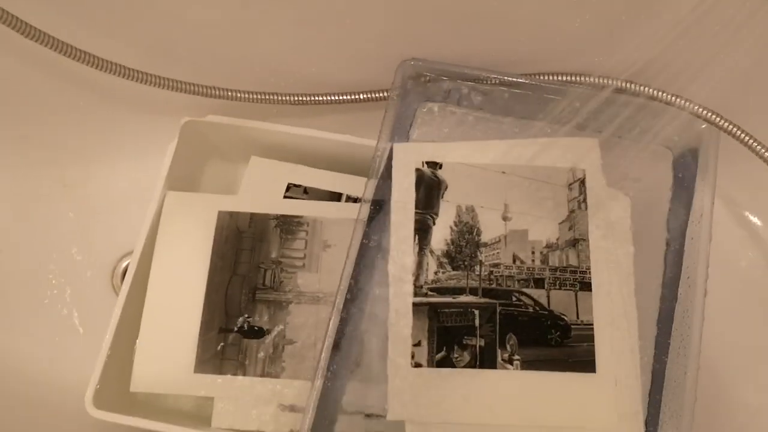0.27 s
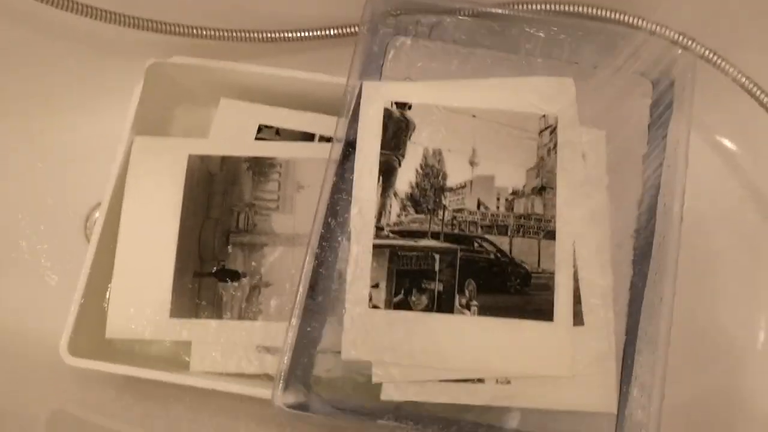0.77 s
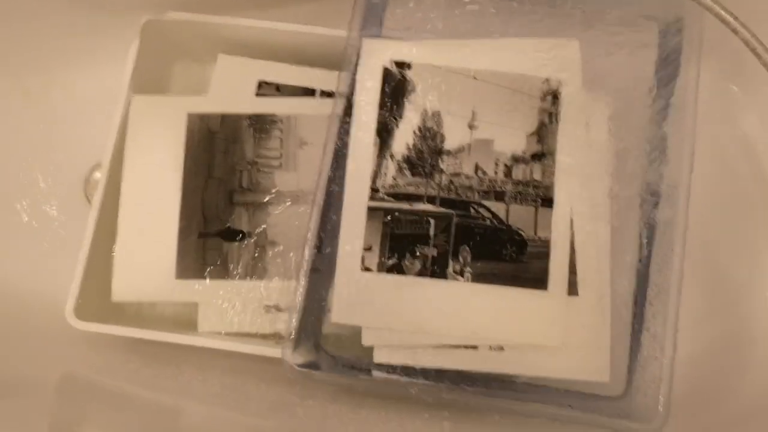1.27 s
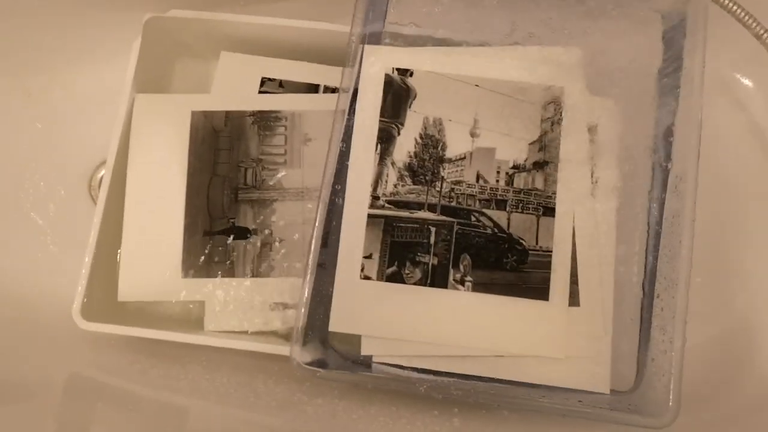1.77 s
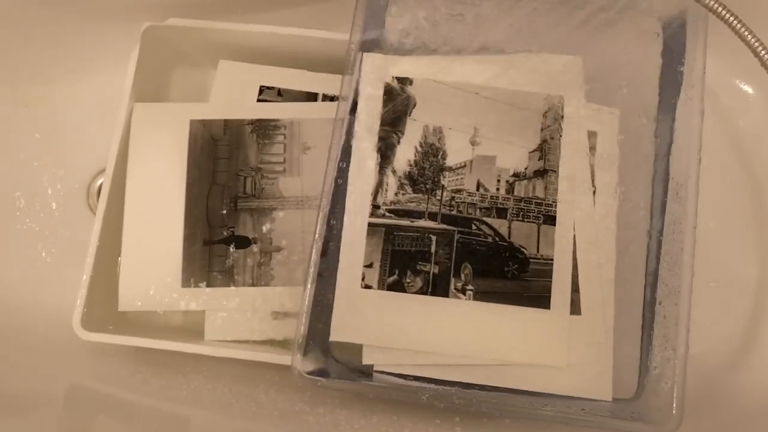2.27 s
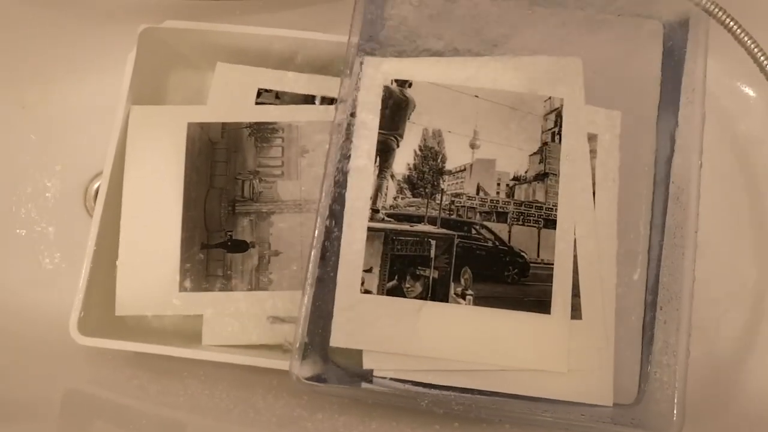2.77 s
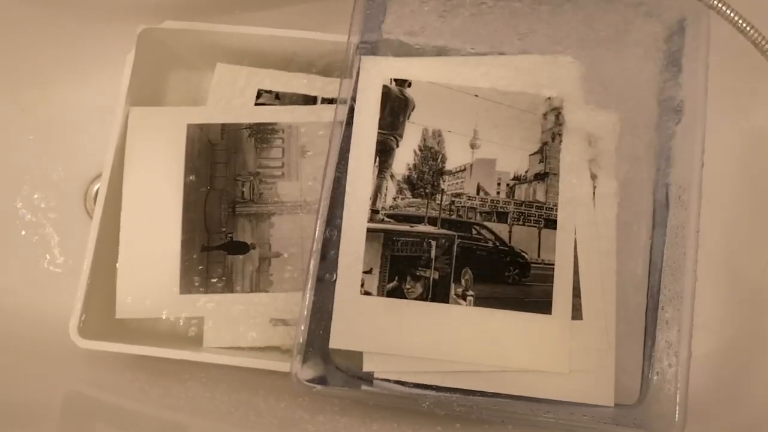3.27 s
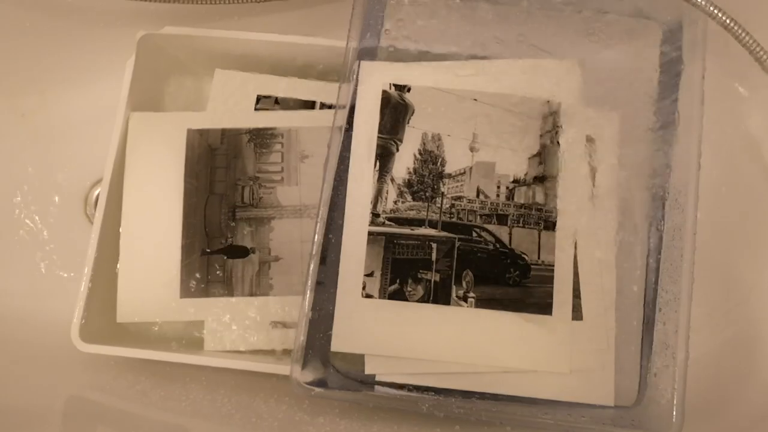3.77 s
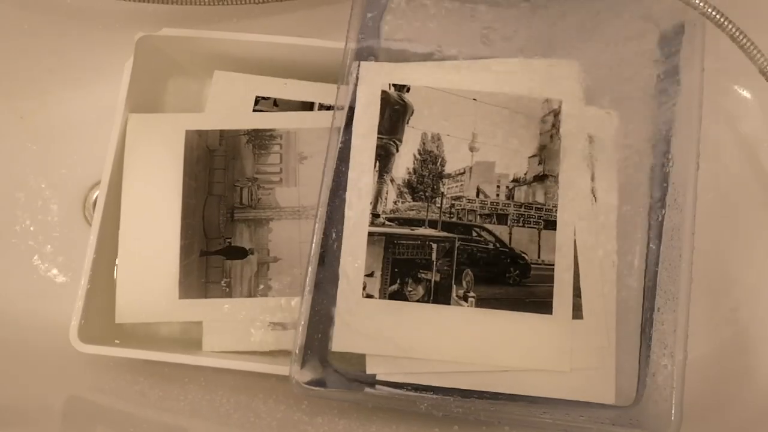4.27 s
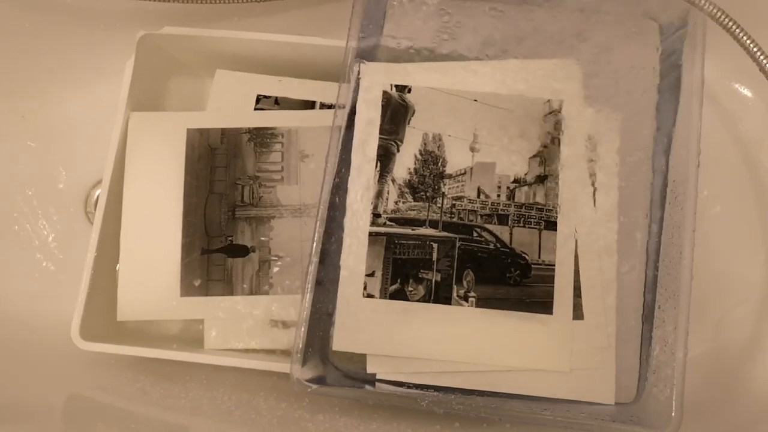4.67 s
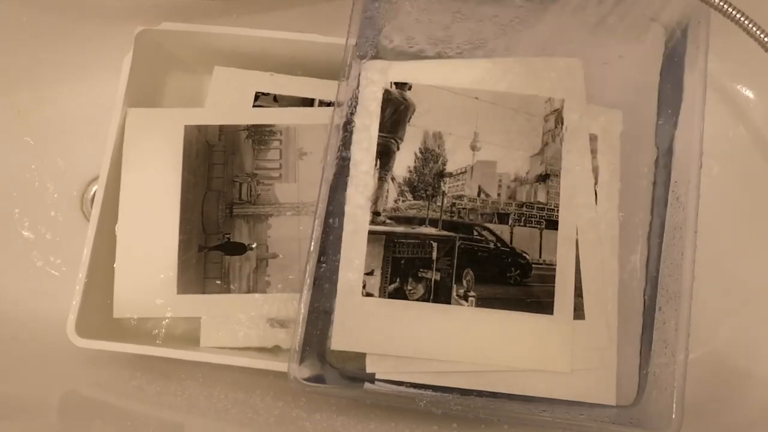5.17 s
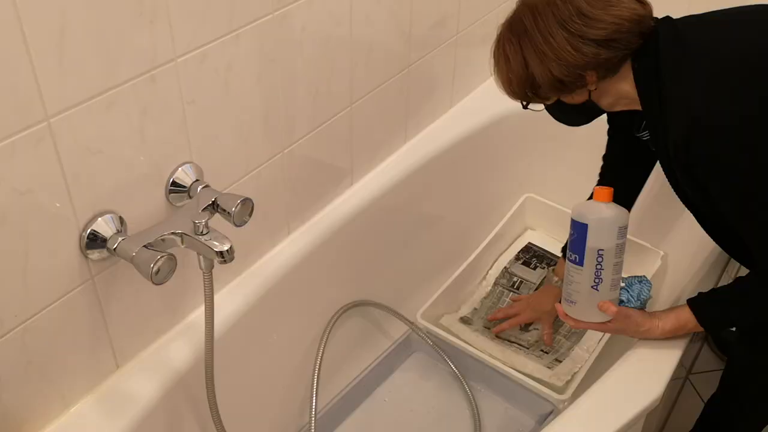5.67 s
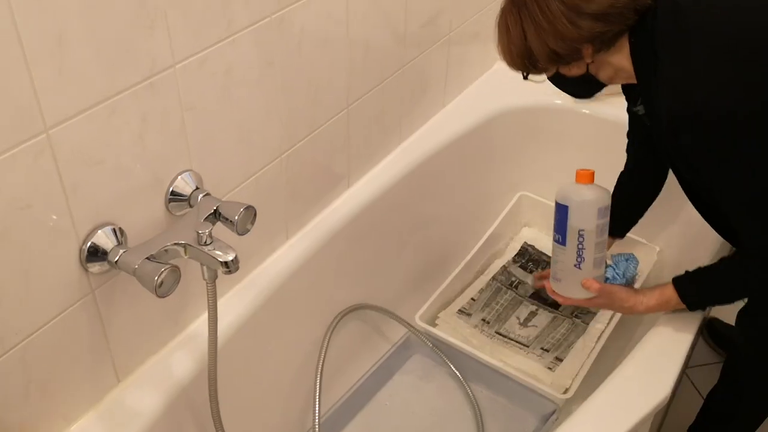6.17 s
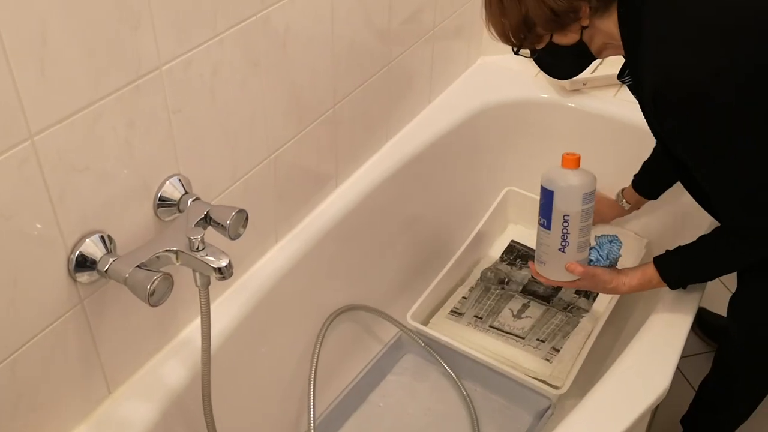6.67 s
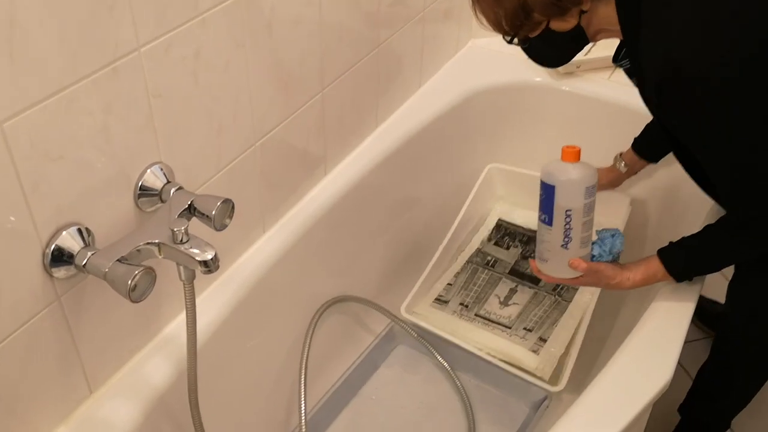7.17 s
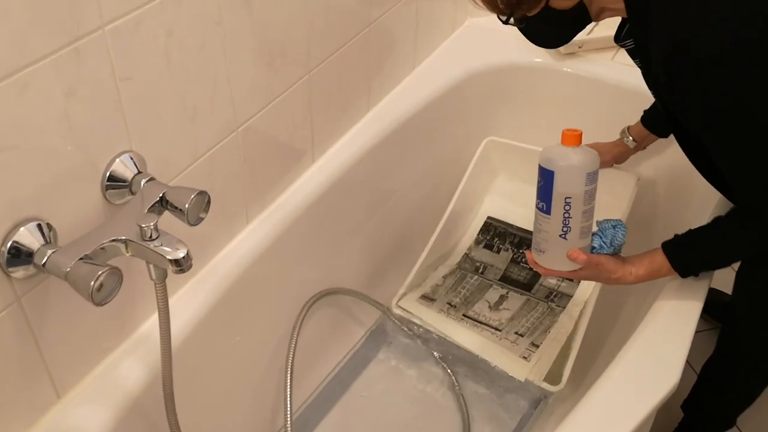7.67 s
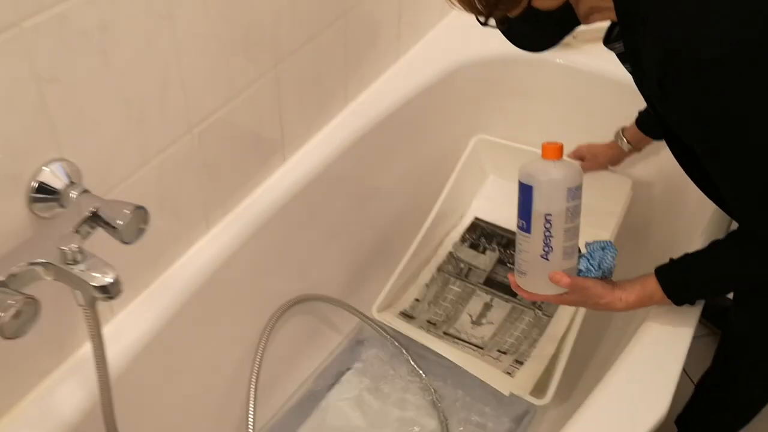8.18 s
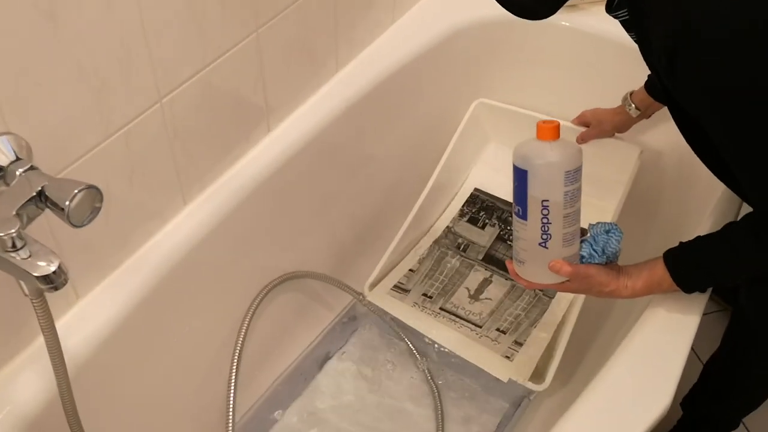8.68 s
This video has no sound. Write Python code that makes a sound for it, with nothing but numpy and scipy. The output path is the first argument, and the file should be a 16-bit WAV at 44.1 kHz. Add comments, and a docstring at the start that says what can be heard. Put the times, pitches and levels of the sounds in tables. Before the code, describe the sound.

A hand shower sprays and gurgles into a water-filled plastic tray up close, then silence, tray knocks on a hollow bathtub and water pouring out.

```python
"""A hand shower runs into a plastic tray of water in a bathtub, close by: spray hisses and fizzes, jets gurgle.
After a short silent break the tiled bathroom is heard from farther off: a tray is shifted on the hollow tub,
clacks against it, and is tipped so that its water pours out and dribbles away.
Bubbles are decaying sines born at random, streams of water are coloured noise, struck bodies are sums of
damped modes, and the room is a reverberation of decaying noise."""
import sys
import numpy as np
from scipy import signal
from scipy.fft import rfft, irfft, next_fast_len
from scipy.io import wavfile
from scipy.ndimage import uniform_filter1d

SR = 44100
rng = np.random.default_rng(int(sys.argv[2]) if len(sys.argv) > 2 else 0)


def wav_out(sig):
    """Save sig, one row per channel (or a flat mono array), as 16-bit PCM at SR to the path in sys.argv[1]."""
    wavfile.write(sys.argv[1], SR, np.round(np.clip(np.atleast_2d(sig).T, -1, 1) * 32767).astype(np.int16))


N = 394254
TIME = np.arange(N) / SR

# Levels stand before the trims stated in each mix; spectra and modes give relative levels.
# Silent break between the near and the far part: (start [s], end [s])
BREAK = (5.676, 6.047)

# Spray on the water, swelling as the shower head swings over it: (time [s], hiss [dB], fizz [dB])
SPRAY_LEVELS = [(0, -44.5, -40), (0.22, -64.5, -42.5), (0.63, -56.5, -50), (0.76, -49, -43.5),
                (0.9, -43.5, -41), (1.47, -40, -36), (1.53, -47.5, -40), (2.1, -48.5, -44.5),
                (2.45, -56.5, -57), (2.75, -54, -58), (3, -53.5, -47), (3.55, -45.5, -42.5),
                (3.75, -52, -47), (4.7, -53, -55.5), (4.92, -52.5, -47), (5.25, -58.5, -58.5)]
# Heavy drops that splash, ringing near the pitch of the fizz: (time [s], peak [dB])
HEAVY_DROPS = [(0.1467, -21), (0.381, -23.5), (0.7086, -34), (0.771, -25), (1.1682, -25.5), (1.39, -24),
               (1.6597, -22), (1.8607, -21), (2.1966, -26), (2.929, -29.5), (3.1664, -21)]
# Spectra of the smooth hiss and of the fizz: (frequency [Hz], density [dB per Hz])
HISS_SPECTRUM = [(1100, -15), (1600, 14), (2600, 20), (4000, 1), (5400, 10), (6900, 14.5), (9500, 3.5),
                 (12000, -35.5)]
FIZZ_SPECTRUM = [(5500, -18), (7700, -4), (8500, -25), (10000, 2)]
FIZZ_HZ, FIZZ_SAG_HZ_PER_S = 8515, 376  # nominal pitch of the finest bubbles at the start, and its fall
# Satellite bubbles of a splash: mean delay [s], greatest rise in pitch [octaves], level [dB]
SPLASH_DELAY_S, SPLASH_OCTAVES, SPLASH_DB = .002, .25, -8

# The jets stray on to the tray's bare wall: (time [s], length [s], drumming [dB], sizzle [dB])
WALL_PASSES = [(0, 0.13, -55.5, -36.5), (0.1, 0.59, -71, -40), (3.22, 0.35, -60, -42.5),
               (4.07, 0.25, -63, -50)]
# Spectra of the drumming and of the sizzle: (frequency [Hz], density [dB per Hz])
DRUMMING_SPECTRUM = [(80, 5), (160, -3.5), (230, 4), (390, -3), (600, -13.5), (870, 0.5)]
SIZZLE_SPECTRUM = [(7000, -0.5), (11000, -33.5), (14700, -31)]
PASS_ATTACK_S, PASS_RELEASE_S = 0.015, 0.015
DRUM_UNDER_HISS_DB, SIZZLE_REST_DB = -18.5, -52.5  # what reaches the tray through the water

# Gulps of air dragged under by the jets:
# (time [s], length [s], level [dB], nominal lowest pitch at the start [Hz], its fall [octaves])
GULPS = [(0.351, .08, -43.5, 2120, 0.0089), (0.5, .1, -44, 2055, -0.12), (0.717, .12, -44, 1540, 0.016),
         (0.845, .13, -38.5, 1438, 0.26), (0.971, .21, -34.5, 1083, -0.12), (1.198, .28, -33, 1254, 0.13),
         (1.483, .15, -37.5, 1360, 0.18), (1.633, .27, -39.5, 1283, -0.13), (1.922, .28, -39, 1203, -0.23),
         (2.636, .12, -48.5, 1523, -0.26), (2.82, .26, -36, 1371, 0.22), (3.105, .17, -32, 1476, 0.34),
         (3.328, .23, -33, 1021, -0.26), (3.58, .23, -39.5, 1484, 0.31), (3.88, .09, -43, 1703, 0.3),
         (3.966, .17, -37.5, 1398, 0.45), (4.222, .07, -42, 954, 0.099), (4.302, .15, -35.5, 1089, 0.18),
         (4.64, .25, -48, 1586, 0.45), (4.946, .11, -42.5, 1360, 0.071), (5.545, .13, -35, 1522, 0.075)]
# Single large bubbles: (time [s], peak [dB], pitch [Hz])
LARGE_BUBBLES = [(2.798, -22.5, 2592), (2.813, -26, 1596), (2.8804, -27, 1436), (3.1093, -25, 2532),
                 (3.8257, -28, 1830), (3.905, -27, 2108), (3.9963, -32.5, 3123), (4.0382, -30, 1473),
                 (4.2963, -23, 2283), (4.3493, -24.5, 1379), (5.5416, -31, 1720), (5.5702, -25.5, 2304)]
# Spectrum of the fused bubbles before bending: (frequency [Hz], density [dB per Hz])
WASH_SPECTRUM = [(1200, -15.5), (1650, 4.5), (2300, 4.5), (3600, -19.5)]
GULP_ATTACK_S, GULP_RELEASE_S = .025, .04
CALM_DB, CALM_HZ = -64, 1207  # the bubbling between gulps
FAINT_DB, STRONG_DB = -48, -32.5  # levels of a faint and of a strong gulp
NARROW_OCTAVES, WIDE_OCTAVES = .42, 1.54  # nominal spread of bubble pitches in each
FAINT_TOP_HZ, STRONG_TOP_HZ = 2099, 4400  # nominal pitch of the smallest bubbles that each can make
WASH_HZ, WASH_FOLLOWS = 1993, .7  # centre of the wash; share of the gulps' pitch swing that it follows

# Hard knocks of the tray: (time [s], level [dB], rattle decay to 1/e [s], treble tilt [dB per octave])
KNOCKS = [(0.002, -40.5, 0.047, -4), (6.785, -52.5, 0.03, 0.5), (6.849, -22.5, 0.0091, -4),
          (6.872, -26.5, 0.046, -5), (7.034, -30.5, 0.0099, -1.5), (7.876, -34, 0.0087, 4.5),
          (8.803, -48, 0.0053, -0.5)]
# Spectrum of the crack before its tilt: (frequency [Hz], density [dB per Hz])
CRACK_SPECTRUM = [(170, -27), (400, -15.5), (600, -16), (950, -15), (2700, -6.5), (3900, -17), (5000, -9),
                  (8900, -23), (14800, -68)]
# Modes with which the tray rings: (frequency [Hz], level [dB], t60 [s])
TRAY_MODES = [(389, -0.5, 0.39), (462, -3, 0.36), (777, -12, 0.17), (849, 7, 0.11), (973, 0.5, 0.15)]

# Hollow glugs of trapped air: (time [s], length [s], level [dB])
HOLLOW_GLUGS = [(0.99, .16, -54), (1.631, .21, -53), (2.0, .14, -58), (2.368, .23, -62.5),
                (3.22, .18, -55.5), (3.516, .09, -48), (6.03, .08, -53), (7.709, .11, -55),
                (8.263, .06, -55)]
HOLLOW_HZ, HOLLOW_STRAY = 893.4, 1.17  # pitch of their bubbles; greatest ratio by which they stray from it

# Soft bumps on the tub: (time [s], level [dB], contact time [s])
BUMPS = [(4.584, -38.5, 0.0044), (4.812, -37.5, 0.007), (6.507, -31, 0.0037), (6.542, -32.5, 0.0027),
         (7.218, -40, 0.0016), (7.586, -32, 0.0054), (7.883, -25, 0.0072)]
# Modes with which the tub booms: (frequency [Hz], level [dB], t60 [s])
TUB_MODES = [(71.5, -5, 0.45), (111.5, 4.5, 0.21), (170.2, -8.5, 0.52), (232.4, 3.5, 0.12)]
# The tray is shoved over the tub: (time [s], length [s], rumble [dB])
SHOVES = [(6.06, 0.047, -49), (6.3, 0.087, -42.5), (6.48, 0.052, -37.5), (6.85, 0.15, -31),
          (7.22, 0.0088, -40), (7.46, 0.1, -51), (7.87, 0.19, -36)]
# Spectrum of the rumble: (frequency [Hz], density [dB per Hz])
RUMBLE_SPECTRUM = [(55, 1), (110, 19.5), (190, 6.5), (350, 10), (550, 0.5), (1000, -1)]
SHOVE_ATTACK_S, SHOVE_RELEASE_S, HANDLING_DB = 0.0021, 0.09, -58  # the last is the rumble between shoves

# Water slops in and out of the tipped tray: (time [s], length [s], slosh [dB], splatter [dB])
SLOPS = [(6.021, 0.11, -50, -64.5), (6.19, 0.1, -57.5, -71.5), (7.614, 0.059, -60.5, -56.5),
         (7.704, 0.091, -50, -52.5), (7.773, 0.19, -42, -47), (7.894, .12, -39, -48.5),
         (8.03, 0.17, -43, -50), (8.22, 0.14, -50, -61), (8.357, 0.14, -54, -67.5),
         (8.646, 0.086, -53.5, -56.5), (8.779, 0.11, -55, -55.5)]
# Single drips off the tray: (time [s], peak [dB], pitch [Hz])
DRIPS = [(7.632, -39, 5600), (8.075, -31.5, 5450), (8.14, -33, 5200), (8.665, -41.5, 2410),
         (8.703, -42, 3370), (8.7565, -39.5, 8800), (8.805, -32.5, 5500), (8.875, -51, 1880)]
# Spectrum of the splatter: (frequency [Hz], density [dB per Hz])
SPLATTER_SPECTRUM = [(2800, -12.5), (3900, -18.5), (5200, -14), (8900, -21.5), (14500, -35)]
SLOP_ATTACK_S, SLOP_RELEASE_S = 0.028, 0.037
LAPPING_DB = -71  # slosh between slops
FAINT_SLOSH_HZ, STRONG_SLOSH_HZ = 2248, 1523  # a stronger slop traps larger bubbles

# Spectrum of the room's background: (frequency [Hz], density [dB per Hz])
ROOM_TONE = [(30, 21), (100, 18.5), (250, -5.5), (1200, -6), (5500, -11.5), (15000, -33)]
# Bathroom reverberation: (frequency [Hz], t60 [s])
ROOM_T60 = [(150, 0.16), (1000, 0.37), (12000, 0.22)]
ROOM_TONE_DB, CUTOFF_HZ = -56.5, 15700


def from_db(db):
    """Amplitude gain is ten to the power of a twentieth of the decibels."""
    return 10 ** (np.asarray(db) / 20)


def in_time(rows):
    """Linear interpolation gives each column of a curve at every sample."""
    s, *columns = np.transpose(rows)
    return [np.interp(TIME, s, column) for column in columns]


def at_hz(points, hz):
    """Interpolation on a logarithmic frequency axis, as octaves are equal ratios."""
    table_hz, values = np.array(points).T
    return np.interp(np.log(hz + 1e-9), np.log(table_hz), values)


def unit(x):
    """Power normalisation: the centre of a stereo pair gets rms 1."""
    return x / np.sqrt(np.mean(x.mean(0) ** 2) + 1e-20)


def steady(x, span_s):
    """Division by the short-time rms evens out the slow swells of a stream of grains."""
    x = unit(x)
    power = uniform_filter1d(x.mean(0) ** 2, max(int(span_s * SR), 2))
    return x / np.sqrt(power + 1e-3)


def panned(x, pan_db):
    """Level difference between the ears: left louder than right by pan_db."""
    return x * from_db([[pan_db / 2], [-pan_db / 2]])


def coloured(x, spectrum, tilt_db=0):
    """Spectral shaping: a table, tilted per octave up to 6 kHz and falling steeply past its ends."""
    size = next_fast_len(x.shape[-1])
    hz = np.arange(size // 2 + 1) * SR / size + 1
    octaves_outside = np.abs(np.log2(hz / np.clip(hz, spectrum[0][0], spectrum[-1][0])))
    tilt = tilt_db * np.log2(np.minimum(hz, 6000))
    gain = from_db(at_hz(spectrum, hz) + tilt - 30 * octaves_outside)
    return unit(irfft(rfft(x, size) * gain, size)[:, :x.shape[-1]])


def noise(side, size=N):
    """White noise whose stereo coherence falls from mono at side 0 to fully diffuse at 1."""
    mid, wide = rng.standard_normal((2, size))
    return unit(np.array([mid + side * wide, mid - side * wide]))


def add(out, s, sound):
    """Superposition: mix a sound in at time s."""
    at = max(int(s * SR), 0)
    out[:, at:at + sound.shape[-1]] += sound[..., :N - at]


def wander(per_s):
    """Random modulation: chance values of spread about 1, joined by straight lines."""
    steps = rng.standard_normal(N // 100)
    return np.interp(TIME * per_s, np.arange(len(steps)), steps)


def swell(s, length_s, attack_s, release_s):
    """Envelope of one gesture: a linear rise, a hold and an exponential decay."""
    rise = np.clip((TIME - s) / attack_s, 0, 1)
    decay = np.exp(-np.clip((TIME - s - length_s) / release_s, 0, np.log(1e12)))
    return rise * decay


def swells_db(rows, attack_s, release_s, rest_db):
    """Powers of gestures (time, length, levels) add over a rest: one curve for each level column."""
    shapes = np.array([swell(s, length_s, attack_s, release_s) for s, length_s, *_ in rows])
    _, _, *columns = np.transpose(rows)
    curves = []
    for db, rest in zip(columns, rest_db):
        power = from_db(db) ** 2 @ shapes ** 2 + from_db(rest) ** 2
        curves.append(10 * np.log10(power + 1e-12))
    return curves


def plinks(rows, cycles, pan_db, lag_s=0, scatter_db=2):
    """Bubble resonance: each (time, dB, Hz) swells and dies within a few cycles at a place of its own."""
    s, db, hz = np.transpose(rows)[:, :, None]
    t = TIME[:int(7 * SR * cycles / np.quantile(hz, .1))]
    age = t * hz / cycles
    wave = from_db(db) * age * np.exp(1 - age) * np.sin(2 * np.pi * hz * t)
    left = 2 / (1 + from_db(-pan_db - scatter_db * rng.standard_normal(s.shape)))
    lag = lag_s * rng.uniform(-.5, 1, s.shape)  # the right ear mostly hears it later
    ears = []
    for start, gain in [(s, left), (s + lag, 2 - left)]:
        samples = np.abs(start * SR).astype(int) + np.arange(len(t))
        ears.append(np.bincount(samples.ravel(), (wave * gain).ravel(), N)[:N])
    return np.array(ears)


def swarm(count, span, low_hz, high_hz, size_db, flow_db=0):
    """Random births, denser in strong flow, give bubbles scattered in size and pitch; deep ones are rare."""
    births = np.cumsum(from_db(.7 * flow_db) * (TIME > span[0]) * (TIME < span[1]))
    s = np.interp(rng.random(count), births / births[-1], TIME)
    low, high = (np.interp(s, TIME, hz + 0 * TIME) for hz in (low_hz, high_hz))
    size = np.minimum(rng.standard_normal(count), 2.3)
    pitch = low * (high / low) ** rng.beta(2.8, 2, count)
    return np.column_stack([s, min(size_db, 10) * size, pitch])


def splashed(rows):
    """Break-up: each drop (time, dB, Hz) rings one bubble and a quick burst of six of scattered pitch."""
    s, db, hz = np.repeat(rows, 6, axis=0).T
    stray = SPLASH_OCTAVES * rng.uniform(-1.864, 1, len(s))
    delay = rng.exponential(SPLASH_DELAY_S, len(s))
    return np.vstack([rows, np.column_stack([s + delay, db + SPLASH_DB, hz * 2 ** stray])])


def ringing(modes):
    """Modal superposition: one second of damped sines, each of random strength per blow; peak 1."""
    t = TIME[:SR]
    out = 0
    for k, (hz, db, t60) in enumerate(modes):
        decay = from_db(db + rng.normal(0, 3.2) - 60 * t / t60)
        out = out + decay * np.sin(2 * np.pi * hz * t) * (-1) ** k
    return out / np.abs(out).max()


def spray():
    """Droplet impact: uneven patter and splashes leave a fizz of tiny bubbles over a smooth hiss."""
    close = (0, BREAK[0])
    hiss_db, fizz_db = in_time(SPRAY_LEVELS)
    fizz_hz = FIZZ_HZ - FIZZ_SAG_HZ_PER_S * TIME
    flurry = from_db(1.8 * wander(per_s=27))
    patter = swarm(11000, close, low_hz=2000, high_hz=8200, size_db=5, flow_db=hiss_db / 2)
    patter = plinks(patter, cycles=3.4, lag_s=0.00051, pan_db=6.0, scatter_db=2.5)
    patter = steady(patter, span_s=0.34)
    hiss = coloured(panned(noise(side=1.0), pan_db=6.0), HISS_SPECTRUM)
    fizz = swarm(5500, close, low_hz=0.809 * fizz_hz, high_hz=1.15 * fizz_hz, size_db=7.5)
    fizz = coloured(plinks(fizz, cycles=12.1, pan_db=28.5), FIZZ_SPECTRUM)
    fizz = steady(fizz, span_s=0.37)
    splashes = swarm(170, close, low_hz=4800, high_hz=1.1 * fizz_hz, size_db=4)
    splashes = unit(plinks(splashed(splashes), cycles=5.5, pan_db=15)) * from_db(-9)
    s, db = np.transpose(HEAVY_DROPS)
    drops = splashed(np.column_stack([s, db - 2, np.interp(s, TIME, 0.974 * fizz_hz)]))
    drops = plinks(drops, cycles=6, pan_db=16)
    impacts = (patter * flurry + hiss) * from_db(hiss_db)
    return impacts + (fizz * flurry + splashes) * from_db(fizz_db) + drops


def jets():
    """Jet impact: low noise drums on the tray, and tiny ticks sizzle where the jets hit its bare wall."""
    hiss_db, _ = in_time(SPRAY_LEVELS)
    rest_db = [hiss_db + DRUM_UNDER_HISS_DB, SIZZLE_REST_DB]
    drum_db, sizzle_db = swells_db(WALL_PASSES, PASS_ATTACK_S, PASS_RELEASE_S, rest_db)
    ticks = swarm(6000, (0, BREAK[0]), low_hz=8000, high_hz=15000, size_db=8)
    sizzle = coloured(plinks(ticks, cycles=1.4, lag_s=0.0029, pan_db=-1), SIZZLE_SPECTRUM)
    drumming = coloured(noise(side=0.14), DRUMMING_SPECTRUM)
    return sizzle * from_db(sizzle_db - 10.0) + drumming * from_db(drum_db)


def gulping():
    """Air entrainment: gulp powers add, and the power-weighted mean in octaves sets the lowest pitch."""
    power = from_db(CALM_DB) ** 2
    octaves = power * np.log2(CALM_HZ)
    for s, length_s, db, hz, fall in GULPS:
        own = (from_db(db) * swell(s, length_s, GULP_ATTACK_S, GULP_RELEASE_S)) ** 2
        power = power + own
        octaves = octaves + own * (np.log2(hz) - fall * np.clip((TIME - s) / length_s, 0, 1))
    return 10 * np.log10(power), 2 ** (octaves / power)


def bent(x, speed):
    """Resampling: reading noise at a changing speed raises or lowers its pitch."""
    at = np.cumsum(speed) % N
    return np.array([np.interp(at, np.arange(N), ear) for ear in x])


def gurgle():
    """Bubble resonance of entrained air: clumps of like pitch, large bubbles alone, and a fused wash."""
    level_db, lowest_hz = gulping()
    strength = [FAINT_DB, STRONG_DB]
    # harder churning breaks off smaller bubbles
    highest_hz = lowest_hz * 2 ** np.interp(level_db, strength, [NARROW_OCTAVES, WIDE_OCTAVES])
    highest_hz = np.minimum(highest_hz, np.interp(level_db, strength, [FAINT_TOP_HZ, STRONG_TOP_HZ]))
    clump_pitch = 2 ** (.13 * wander(per_s=25))
    clump_db = 2 * wander(per_s=22)
    crowd = swarm(3000, (0, BREAK[0]), low_hz=0.9116 * lowest_hz * clump_pitch,
                  high_hz=0.956 * highest_hz * clump_pitch, size_db=6.5, flow_db=level_db)
    crowd = plinks(crowd, cycles=5.1, lag_s=0.00026, pan_db=5.0)
    crowd = steady(crowd, span_s=0.069) * from_db(level_db + clump_db - 3.5)
    large = plinks(LARGE_BUBBLES, cycles=3.3, pan_db=8)
    wash = coloured(panned(noise(side=0.98), pan_db=11.5), WASH_SPECTRUM)  # countless faint bubbles fuse
    middle_hz = np.sqrt(lowest_hz * highest_hz)
    wash = bent(wash, (middle_hz / WASH_HZ) ** WASH_FOLLOWS) * from_db(level_db - 9)
    highpass = signal.butter(3, 680, "high", fs=SR, output="sos")
    return signal.sosfilt(highpass, crowd + wash + large)


def knocks():
    """Impact of hard plastic on enamel: a noisy crack with a short rattle excites the tray's modes."""
    out, t = np.zeros((2, N)), TIME[:SR]
    for s, db, rattle_s, tilt_db in KNOCKS:
        crack = coloured(noise(side=0.93, size=SR), CRACK_SPECTRUM, tilt_db) * np.exp(-t / rattle_s)
        ring = from_db(-11.5 - 3.48 * tilt_db) * ringing(TRAY_MODES)  # a duller crack has more ring
        add(out, s, from_db(db) * (crack + ring))
    return out


def hollows():
    """Resonance of large air pockets close in the tray: a narrow cluster of deep bubbles."""
    level_db, = swells_db(HOLLOW_GLUGS, SLOP_ATTACK_S, SLOP_RELEASE_S, [-np.inf])
    pockets = swarm(450, (0, TIME[-1]), low_hz=HOLLOW_HZ / HOLLOW_STRAY,
                    high_hz=HOLLOW_HZ * HOLLOW_STRAY, size_db=1.5, flow_db=level_db)
    pockets = plinks(pockets, cycles=2.7, pan_db=9, scatter_db=12.5)
    return steady(pockets, span_s=0.046) * from_db(level_db)


def tub():
    """Forced vibration of the hollow tub: modes boom under soft bumps, noise rumbles as the tray drags."""
    out = np.zeros((2, N))
    for s, db, contact_s in BUMPS:
        push = np.hanning(int(contact_s * SR) + 3)  # longer contact softens the blow
        add(out, s, from_db(db) * signal.fftconvolve(ringing(TUB_MODES), push / push.sum()))
    drag_db, = swells_db(SHOVES, SHOVE_ATTACK_S, SHOVE_RELEASE_S, [HANDLING_DB])
    rumble = steady(coloured(noise(side=0.39), RUMBLE_SPECTRUM), span_s=0.054)
    return out + (TIME > BREAK[1]) * rumble * from_db(drag_db - 9.5)


def pour():
    """Free-surface flow over the tray's lip: sloshing bubbles, a smooth sheet with splatter, and drips."""
    far = (BREAK[0], TIME[-1])
    slosh_db, splatter_db = swells_db(SLOPS, SLOP_ATTACK_S, SLOP_RELEASE_S, [LAPPING_DB, -np.inf])
    spread = 2 ** np.interp(slosh_db, [-50, -41], [.65, 1.4])  # a stronger slop stirs up more sizes
    pitch_hz = np.interp(slosh_db, [-57, -52], [FAINT_SLOSH_HZ, STRONG_SLOSH_HZ])
    drips = plinks(DRIPS, cycles=7, pan_db=-2)
    slosh = swarm(3000, far, low_hz=pitch_hz / spread, high_hz=pitch_hz * spread,
                  size_db=4, flow_db=slosh_db / 2)
    slosh = plinks(slosh, cycles=4.5, lag_s=0.00074, pan_db=-4.5, scatter_db=12.0)
    slosh = steady(slosh, span_s=0.26) * from_db(slosh_db - 3.0)
    splatter = swarm(4000, far, low_hz=2170, high_hz=11000, size_db=6, flow_db=splatter_db / 2)
    splatter = plinks(splatter, cycles=4, lag_s=0.00033, pan_db=-10.0, scatter_db=6.0)
    splatter = steady(splatter, span_s=0.069)
    sheet = from_db(-3) * panned(noise(side=0.27), pan_db=-1)  # unbroken water
    return slosh + coloured(splatter + sheet, SPLATTER_SPECTRUM) * from_db(splatter_db) + drips


def bathroom(x, tub_db, tub_s, room_db):
    """Reverberation: quick reflections inside the tub, then the tiled room's tail, dying band by band."""
    t = TIME[:SR * 3 // 4]
    early = rng.standard_normal((2, len(t))) * np.exp(-t / tub_s) * (t > .001)
    white, tail = rng.standard_normal((2, len(t))), 0
    edges = np.geomspace(80, 16000, 8)
    for low, high in zip(edges, edges[1:]):
        band = signal.sosfilt(signal.butter(2, [low, high], "band", fs=SR, output="sos"), white)
        decay = from_db(-60 * t / at_hz(ROOM_T60, np.sqrt(low * high)))
        tail = tail + band * decay * np.minimum(t / 0.0056, 1)
    echo = 0
    for db, part in [(tub_db, early), (room_db, tail)]:
        echo = echo + from_db(db) * part / np.sqrt(np.sum(part ** 2) / 2)
    return x + signal.fftconvolve(x, echo, axes=1)[:, :N]


def scene():
    """Superposition of sources: the close shower, a silent break, then the tray from across the room."""
    tray, glugs = knocks(), hollows()
    shower = gurgle() + spray() + jets()
    close = shower + (tray + glugs) * (TIME < BREAK[0])
    close = bathroom(close, tub_db=-10, tub_s=.008, room_db=-9)
    far = bathroom(tray * (TIME > BREAK[1]), tub_db=-1.0, tub_s=0.04, room_db=-4.0)
    far += bathroom(pour() + glugs * (TIME > BREAK[1]), tub_db=-3, tub_s=.016, room_db=-5)
    air = from_db(ROOM_TONE_DB) * coloured(noise(side=0.028), ROOM_TONE)
    before = np.clip((BREAK[0] - TIME) / .003 + 1, 0, 1)  # 3 ms fades
    after = np.clip((TIME - BREAK[1]) / .003, 0, 1)
    return before * close + after * (far + air) + (before + after) * tub()


def record(dry):
    """Low-pass filtering: an elliptic filter cuts the top steeply."""
    return signal.sosfilt(signal.ellip(10, .1, 80, CUTOFF_HZ, fs=SR, output="sos"), dry)


dry = scene()
out = record(dry)
wav_out(out)
```